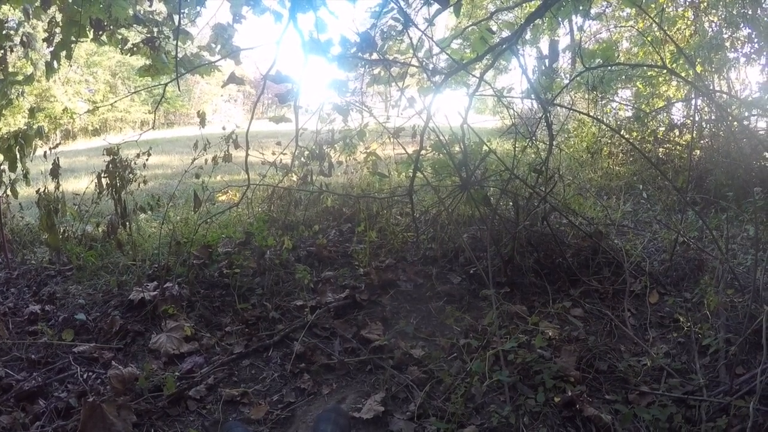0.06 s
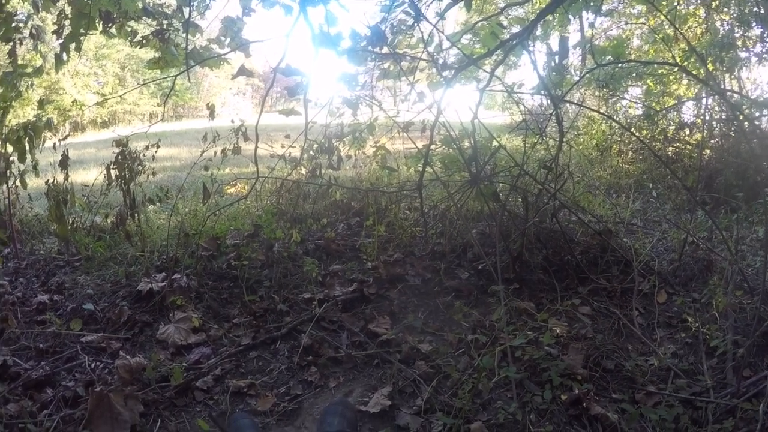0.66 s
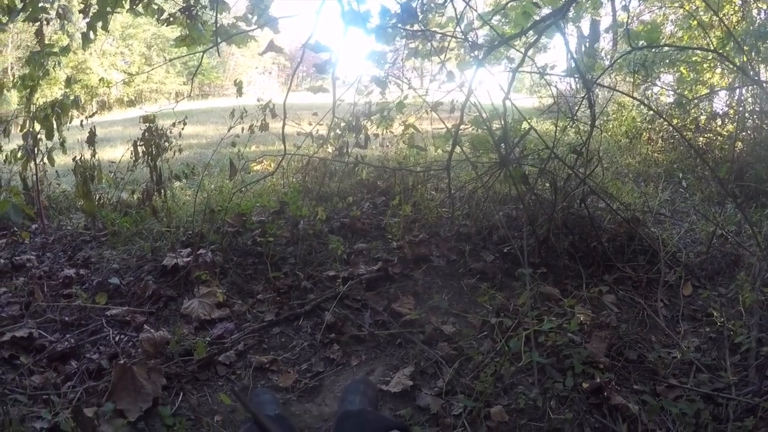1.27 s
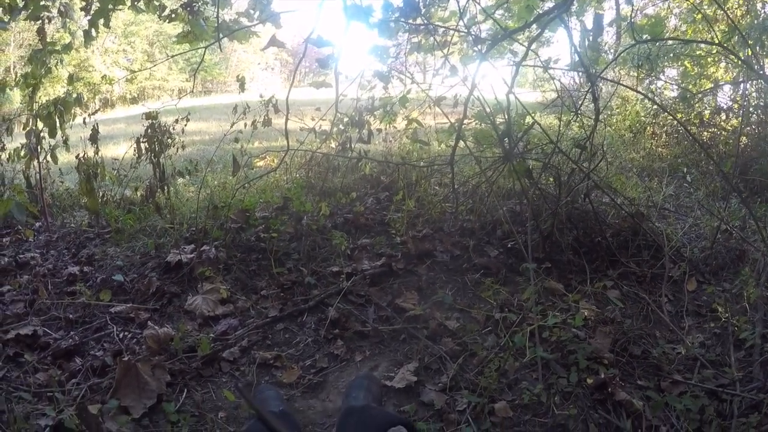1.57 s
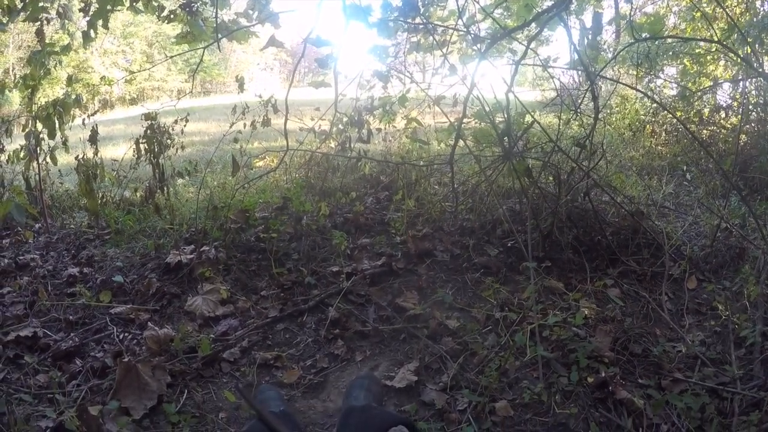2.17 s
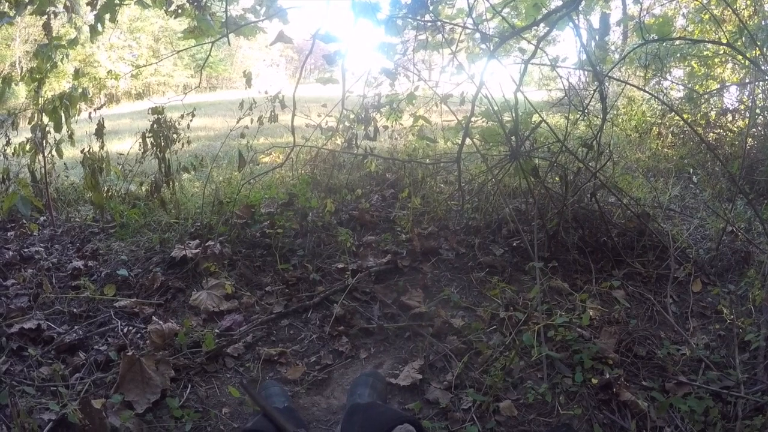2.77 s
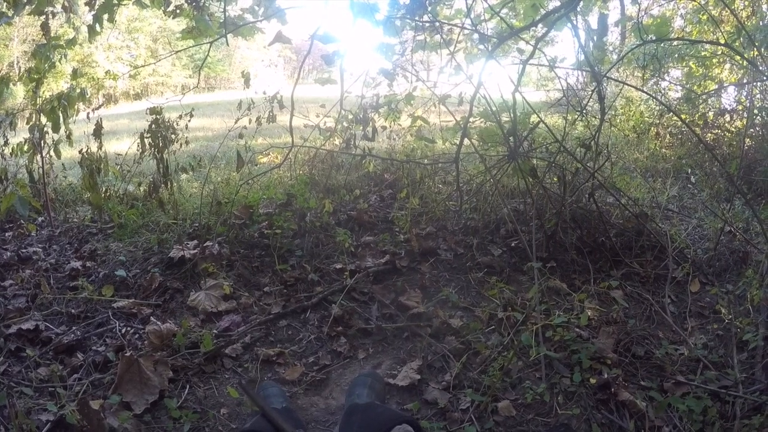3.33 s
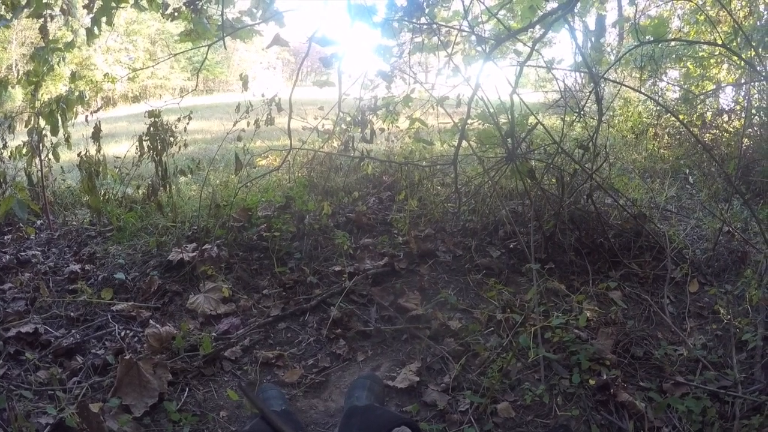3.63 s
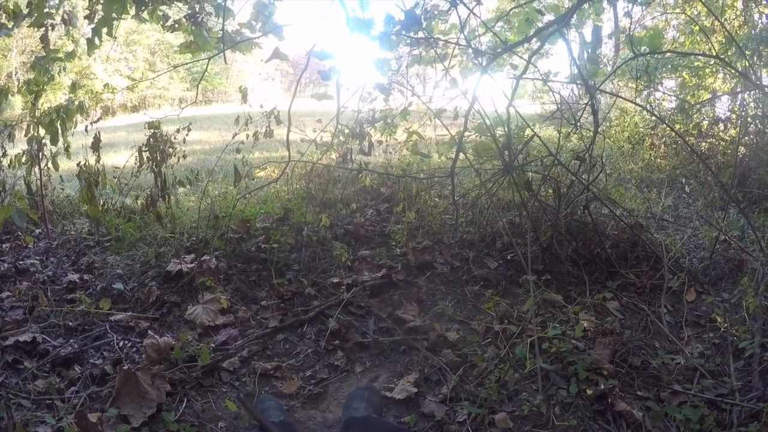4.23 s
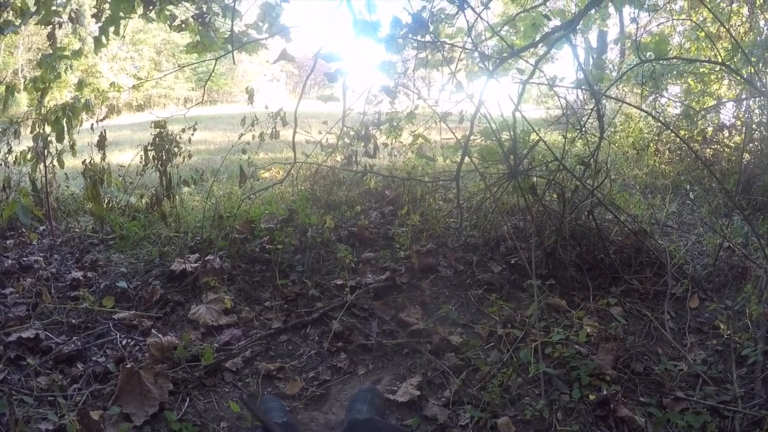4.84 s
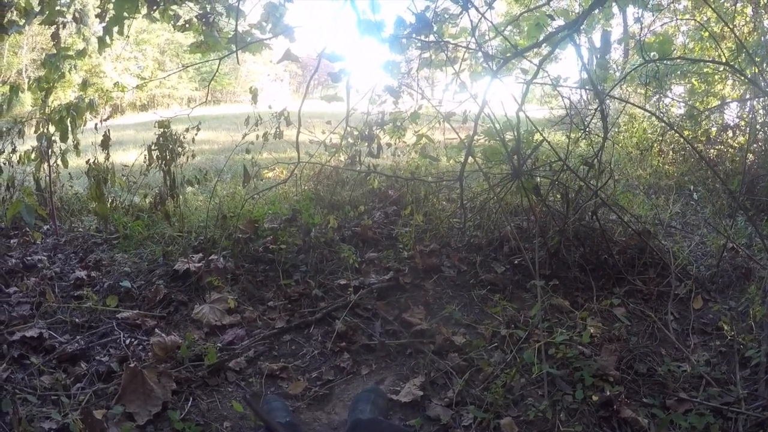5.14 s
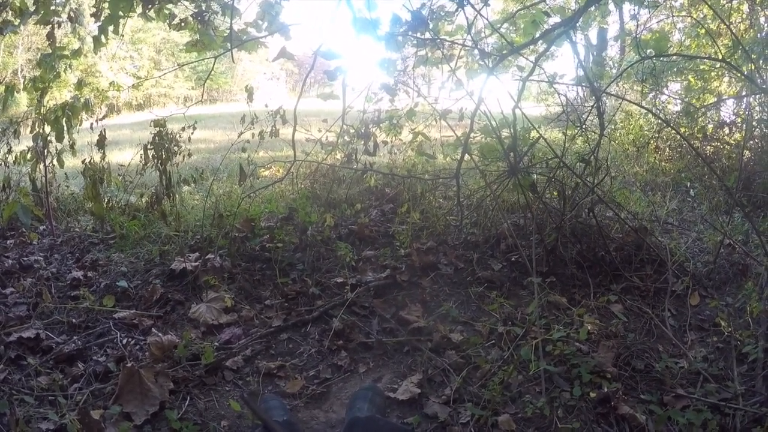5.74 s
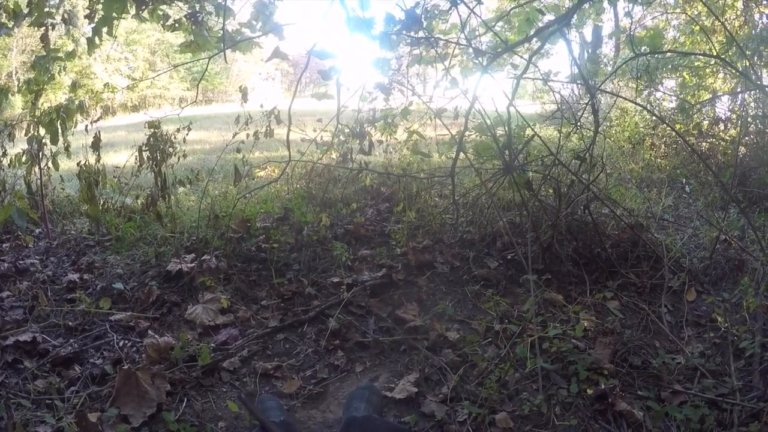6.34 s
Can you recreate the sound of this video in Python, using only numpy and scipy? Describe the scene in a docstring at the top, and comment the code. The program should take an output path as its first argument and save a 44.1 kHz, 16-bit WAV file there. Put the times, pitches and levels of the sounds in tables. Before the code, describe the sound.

One rising and falling yelp from a turkey hen near the microphone is followed by five evenly spaced, squeaky, raspy putts, the last two trailed by a clear pip. Then turkeys among the trees give about eight yelps, mixed with one cluck, and end on two sharp, dry clucks. Each call leaves a soft woodland tail. Beneath are a low far drone, faint outdoor hiss and a very thin high whine.

```python
"""Wild turkeys at the wooded edge of a field. The hen nearest the microphone opens with an arched yelp.
Five putts follow, squeaks that drop into a rasp, the last two trailed by a clear pip. From 2.6 s
comes a run of yelps with a dry cluck near its start, and two more clucks close the scene. Each call is
a pulsing membrane ringing in a throat, scattered by the trees into a long soft tail. Under it all
lie a far rumble and drone, quiet outdoor air and the thin whine of the camera."""
import sys
import numpy as np
from scipy import signal
from scipy.fft import rfft, irfft
from scipy.io import wavfile
from scipy.ndimage import uniform_filter1d, map_coordinates

SR = 44100
rng = np.random.default_rng(int(sys.argv[2]) if len(sys.argv) > 2 else 0)


def store_pcm(level_fs):
    """Save levels as 16-bit WAV."""
    pcm = np.round(np.clip(level_fs, -1, 1) * 32767).astype(np.int16)
    wavfile.write(sys.argv[1], SR, np.atleast_2d(pcm).T)


N = 282240
TIME = np.arange(N) / SR
CUTOFF_HZ = 15300   # top of the camera's range


# Hens among the trees. Each row: start, rise and fall in seconds, top pitch in Hz, level in dB,
# overtone boost in dB, extra boost from the third harmonic up in dB.
YELPS = [ (2.635, 0.058, 0.091, 781, -63.5, 5, -15), (3.038, 0.057, .108, 862.1, -44, 0.5, 8),
         (3.496, 0.057, 0.11, 857.3, -44.5, 2, 4.5), (4.013, .063, .098, 856, -45, 3, 7.5),
         (4.215, 0.0632, 0.13, 768.3, -48.5, 5, 1.5), (4.521, .060, 0.11, 860, -42, 1.5, 6),
         (4.787, .073, .104, 772, -50.5, 2, 1), (5.165, 0.0623, 0.12, 764.7, -51, 11, -7), ]
# Their throat and beak in a yelp. Each row: frequency in Hz, gain in dB.
YELP_THROAT = [(450, -15), (620, -8), (830, -3), (1000, -8), (1200, -6), (1550, 0), (1750, 0), (2000, -8),
               (2200, -26), (2550, -32), (3300, -44), (4100, -32), (4500, -37), (5100, -31), (5900, -48),
               (8000, -60)]
def yelp(rise, fall, top_hz, level_db, bright_db, upper_db, throat=YELP_THROAT,
         droop_db=12, dulling_db=7.5, upper_loss_db=7.0, **voice):
    """The membrane tightens to the top of an arch, then slackens; level and overtones sink with pitch."""
    t = seconds(rise + fall)
    falling = t > rise
    from_top = np.interp(t, [0, rise, rise + fall], [1, 0, 1])
    roundness = np.where(falling, 0.1077, 0.457)   # 0 is a straight slope
    slack = (np.hypot(from_top, roundness) - roundness) / (np.hypot(1, roundness) - roundness)
    pitch = top_hz * (1 - slack * np.where(falling, 0.41, 0.34))
    weak = np.where(falling, 1 - (1 - slack) ** 2, slack)   # the voice gives way early in the fall
    dull = weak * np.where(falling, 1, 0.45)
    return whistle(t, pitch, level_db - droop_db * weak, bright_db - dulling_db * dull,
                   upper_db - upper_loss_db * dull, throat, **voice)


# The hen closest to the microphone. One row, with the same columns as YELPS.
NEAR_YELP = [(.006, .058, .119, 791.4, -35.5, 4.3, -4.5)]
# Her throat. Each row: frequency in Hz, gain in dB.
NEAR_THROAT = [(450, -13.5), (620, -7), (780, -1.5), (1150, 1.5), (1550, 1), (1750, -1), (2000, -14),
               (2350, -25), (3100, -25), (3900, -27), (4300, -29.5), (4650, -22.5), (5300, -22),
               (6000, -36), (8000, -59)]
def near_yelp(*row):
    """The nearest hen has a deeper throat and holds her overtones longer on the way down."""
    return yelp(*row, throat=NEAR_THROAT, droop_db=13.5, dulling_db=5.5, upper_loss_db=-1.5,
                flutter_db=2.26, top_rasp=0.073, slack_rasp=0.81)


# Putts from among the trees. Each row: start, squeak length and rasp length in seconds; squeak start,
# squeak end and final pitch in Hz; squeak level, rasp level and catch in dB; roughness from 0 to 1;
# overtone boost in dB.
PUTTS = [ (.527, .021, .011, 1219, 1087, 830, -39, -40, 3, 0.9, 13.5),
         (.881, 0.03, 0.034, 1128, 1007, 676.7, -51.5, -45, 5, 0.59, -1),
         (1.243, .023, .036, 1599, 1027, 416, -46.5, -44.5, 2, 0.83, 11),
         (1.578, .020, .050, 1097, 995.5, 591, -48, -43.5, 4.5, 0.35, 3),
         (1.939, .026, 0.069, 1119, 988, 602.3, -49.5, -45.5, 1.5, 0.31, 2.5), ]
# Throat and beak in a putt. Each row: frequency in Hz, gain in dB.
PUTT_THROAT = [(400, -16.5), (600, -13), (760, 4), (1000, -0.5), (1250, -2), (1600, 2.5), (1950, -5.5),
               (2250, -6.5), (2550, -14), (3050, -32.5), (3900, -29.5), (4700, -29.5), (5400, -34.5),
               (7000, -42)]
def putt(squeak_s, rasp_s, start_hz, break_hz, final_hz, squeak_db, rasp_db, catch_db,
         roughness, bright_db):
    """A clear, falling squeak breaks into a lower rasp that settles and fades."""
    attack_s, swell_db, catch_s, fade_db = 0.00578, 18.5, 0.0024, 13
    break_ratio, settle_rate = 0.82, 3.5
    t = seconds(squeak_s + rasp_s)
    broken = t > squeak_s
    progress = np.clip((t - squeak_s) / rasp_s, 0, 1)
    squeak_hz = start_hz * (break_hz / start_hz) ** (t / squeak_s)
    rasp_hz = final_hz + (break_ratio * break_hz - final_hz) * np.exp(-settle_rate * progress)
    pitch = np.where(broken, rasp_hz, squeak_hz)
    # the voice catches just before the break, then bursts out by as much
    catch = catch_db * np.exp(-np.abs(t - squeak_s) / catch_s)
    level_db = np.where(broken, rasp_db + catch - fade_db * progress ** 2,
                        squeak_db - catch - swell_db * np.exp(-t / attack_s))
    rasp = 0.068 + roughness * np.sqrt(progress)
    pitch, level_db = uniform_filter1d([pitch, level_db], size=48)   # the break takes about 1 ms
    return syrinx(t, pitch, level_db, rasp, bright_db * (1 - progress), PUTT_THROAT,
                  jitter=0.231, shimmer=1.0, hiss=1.0, fade_s=0.0025)


# Dry clucks among the trees. Each row: start and length in seconds, starting pitch in Hz, level in dB,
# roughness from 0 to 1, boost from the third harmonic up in dB.
CLUCKS = [ (2.981, 0.041, 827.5, -37.5, 0.59, 5.5), (5.565, .025, 830, -36, 0.38, 0.5),
          (6.043, .026, 830, -36, 0.4, -1.5), ]
# The tight throat of a cluck. Each row: frequency in Hz, gain in dB.
CLUCK_THROAT = [(400, -24.5), (620, -22), (780, 4), (930, -10.5), (1250, -11), (1500, 5.5), (1680, 5),
                (1880, -7), (2250, -6.5), (2650, -19), (3100, -32.5), (4600, -35), (5300, -32.5),
                (7000, -65)]
def cluck(length, start_hz, peak_db, roughness, upper_db):
    """A burst of uneven pulses in a tight throat swells while its pitch drops, then is choked off."""
    swell_s, swell_db, choke_db_per_s, fall_octaves_per_s = 0.018, 10, 997.5, 31
    t = seconds(length)
    pitch = start_hz * 2 ** (-fall_octaves_per_s * t)
    level_db = peak_db - np.maximum(swell_db * (1 - t / swell_s), choke_db_per_s * (t - swell_s))
    return syrinx(t, pitch, level_db, roughness, 0, CLUCK_THROAT,
                  jitter=0.2, shimmer=0.35, hiss=1.5, fade_s=0.0015, upper_db=upper_db)


# Clear notes just after two putts. Each row: start and length in seconds, pitch in Hz, level in dB.
PIPS = [(1.644, 0.042, 1017, -42.5), (2.008, 0.041, 1013, -46.5)]
def pip(length, hz, level_db, attack_s=0.011, fade_db=7):
    """An almost pure note that swells and fades on one pitch."""
    t = seconds(length)
    swell_db = np.interp(t, [0, attack_s, length], [-fade_db, 0, -fade_db])
    return whistle(t, np.full(len(t), hz), level_db + swell_db, bright_db=-23)


def whistle(t, pitch, level_db, bright_db, upper_db=0, throat=YELP_THROAT,
            flutter_db=1.3, clear_hz=820, top_rasp=0.14, slack_rasp=0.71):
    """A quavering whistle, clear when high and hoarse where the membrane is slack."""
    rasp = top_rasp + slack_rasp * np.maximum(1 - pitch / clear_hz, 0)
    quaver = 0.016 * wander(t * 110)
    flutter = flutter_db * wander(t * 90)
    return syrinx(t, pitch * (1 + quaver), level_db + flutter, rasp, bright_db, throat,
                  jitter=0.13, shimmer=1.0, hiss=2.2, fade_s=0.005, upper_db=upper_db)


def syrinx(t, pitch, level_db, rasp, bright_db, throat, jitter, shimmer, hiss, fade_s, upper_db=0):
    """Membrane cycles of uneven length and strength, each with a puff of air, ring in the throat."""
    cycles = np.cumsum(pitch) / SR
    uneven_pitch = pitch * (1 + jitter * rasp * wander(cycles))
    phase = 2 * np.pi * np.cumsum(uneven_pitch) / SR
    harmonic = np.arange(1, 15)[:, None]
    in_range = harmonic * pitch < CUTOFF_HZ
    gains = in_range * from_db(bright_db * (harmonic > 1) + upper_db * (harmonic > 2))
    strength = np.exp(shimmer * rasp * wander(cycles))
    pulses = strength * (gains * np.cos(harmonic * phase)).sum(0)
    puffs = (1 + np.cos(phase)) * rng.standard_normal(len(t))
    voice = through_throat(pulses + hiss * rasp * from_db(bright_db / 2) * puffs, throat)
    voice /= np.sqrt(uniform_filter1d(voice ** 2, size=160) + 1e-12)   # effort alone sets the level
    edges = np.clip(np.minimum(t, t[-1] - t) / fade_s, 0, 1)
    return voice * edges * from_db(level_db)


def through_throat(x, throat, size=2048):
    """The throat as a causal filter: each pulse sets it ringing."""
    hz = np.abs(np.fft.fftfreq(size, 1 / SR))
    log_gain = np.log(gain_at(throat, hz))
    minimum_phase = np.exp(np.conj(signal.hilbert(log_gain)))
    ring = np.fft.ifft(minimum_phase).real
    return signal.fftconvolve(x, ring)[:len(x)]


def calls(table, voice, near_echo_db=-10):
    """The birds move, so each call of a table reaches the microphone with its own close reflection."""
    out = np.zeros(N + SR)
    for start, *row in table:
        call = voice(*row)
        at = int(start * SR) + np.arange(len(call))
        lag = int(rng.uniform(0.003, 0.008) * SR)
        out[at] += call
        out[at + lag] += from_db(near_echo_db) * call   # gliding harmonics run through its notches
    return out[:N]


def flock(near_wet_db=-6, pip_wet_db=-5, spill_db=-2, cluck_spill_db=3):
    """All the birds as heard from the field's edge; the nearest stirs the woods least."""
    putts, clucks = calls(PUTTS, putt), calls(CLUCKS, cluck)
    among_trees = calls(YELPS, yelp) + putts + clucks
    near = calls(NEAR_YELP, near_yelp, near_echo_db=-15)
    pips = calls(PIPS, pip)
    echoes = woods(among_trees + from_db(near_wet_db) * near + from_db(pip_wet_db) * pips)
    # the low part of a short call spreads all round and comes back from deeper in the trees
    low = low_pass(putts + from_db(cluck_spill_db) * clucks, hz=1000, order=4)
    spill = from_db(spill_db) * scatter(low, t60=0.79, build_up_s=0.16)
    return among_trees + near + pips + echoes + spill


# Distinct echoes off near trunks and the tree line. Each row: delay in seconds, gain in dB.
ECHOES = [(.0105, -20.5), (.022, -12), (.034, -15), (.072, -25), (.104, -20)]
def woods(x, brush_db=-12, forest_db=-8):
    """Dull echoes off trunks, a short blur from near brush, a long tail that loses treble in leaves."""
    dull = low_pass(x, hz=3000, order=1)
    trunks = sum(from_db(db) * np.interp(TIME - delay, TIME, dull, left=0) for delay, db in ECHOES)
    brush = from_db(brush_db) * scatter(x, t60=0.12, build_up_s=0.0099)
    far = low_pass(x, hz=3300, order=2)
    forest = from_db(forest_db) * scatter(far, t60=1.0, build_up_s=0.081)
    return trunks + brush + forest


# Colour of the tail coming back from the trees. Each row: frequency in Hz, gain in dB.
TAIL_COLOUR = [(300, 9.5), (750, 3), (1050, 7.5), (1600, 2), (2300, -4), (4500, 15), (9000, -12.5)]
def scatter(x, t60, build_up_s):
    """Countless small echoes that gather and die away."""
    t = TIME[:2 * SR]
    envelope = (1 - np.exp(-t / build_up_s)) * from_db(-60 * t / t60)
    response = coloured_noise(len(t), TAIL_COLOUR) * envelope / np.sqrt(np.sum(envelope ** 2))
    return signal.fftconvolve(x, response)[:N]


# Rumble from far off. Each row: frequency in Hz, relative noise density in dB.
RUMBLE_COLOUR = [(15, -28), (25, -6), (37, 10.5), (52, -6.5), (74, 5), (88, -2), (120, -4), (170, -15.5),
                 (240, -19.5), (390, -48), (700, -48), (2000, -53)]
def far_rumble():
    """A deep, distant noise that swells slightly."""
    return background(RUMBLE_COLOUR, level_db=-52.5, swell_db=0.97)


# A drone in the distance. Each row: frequency in Hz, relative noise density in dB.
DRONE_COLOUR = [(70, -22), (120, -2), (180, -3), (240, -6.5), (305, 0.5), (390, -7), (550, -7), (900, -42)]
# Its slow course. Each row: time in seconds, level in dB before lulls and swells.
DRONE_LEVEL = [(0, -62.5), (1.6, -60.5), (3, -63.5), (4.5, -60), (5.5, -63), (6.4, -67)]
# Its lulls. Each row: centre and half-width in seconds, depth in dB.
DRONE_LULLS = [(1.1, .13, 13.5), (2.3, 0.21, 18.5), (3.89, 0.059, 22), (5.08, 0.16, 25)]
def far_drone():
    """A low, distant noise that swells slowly and sinks away in lulls."""
    level_db = np.interp(TIME, *np.transpose(DRONE_LEVEL))
    lulls_db = sum(depth * np.exp(-((TIME - s) / width) ** 2) for s, width, depth in DRONE_LULLS)
    return background(DRONE_COLOUR, level_db - lulls_db, swell_db=2.3)


# Open air around the microphone. Each row: frequency in Hz, relative noise density in dB.
AIR_COLOUR = [(200, 0), (500, -3.5), (730, 7), (900, 0), (1100, -5), (1500, -5.5), (1900, -9), (3200, -12),
              (4900, -10.5), (6300, -15.5), (9500, -20.5), (10100, -13.5), (11000, -20), (15200, -23.5)]
def field_air():
    """The faint, steady hiss of the outdoors."""
    return background(AIR_COLOUR, level_db=-60.5, swell_db=0)


def background(spectrum, level_db, swell_db):
    """Coloured noise whose rms level drifts at random about level_db."""
    noise = coloured_noise(N, spectrum)
    noise /= np.sqrt(np.mean(noise ** 2))
    return noise * from_db(level_db + swell_db * wander(TIME * 2))


def coloured_noise(n, spectrum):
    """White noise shaped by a spectrum."""
    gain = gain_at(spectrum, np.fft.rfftfreq(n, 1 / SR))
    return irfft(rfft(rng.standard_normal(n)) * gain, n)


def gain_at(spectrum, hz):
    """Read a dB spectrum on a log-frequency axis, as a gain."""
    points_hz, db = np.transpose(spectrum)
    return from_db(np.interp(np.log(np.maximum(hz, 1)), np.log(points_hz), db))


def low_pass(x, hz, order):
    """Roll off the treble above hz."""
    return signal.sosfilt(signal.butter(order, hz, fs=SR, output="sos"), x)


def wander(position):
    """A fresh random value at every whole step of position, joined smoothly."""
    return map_coordinates(rng.standard_normal(1024), [position], order=3, mode="wrap")


def from_db(db):
    """Decibels to gain."""
    return 10 ** (np.asarray(db) / 20)


def seconds(length):
    """The time axis of one call."""
    return np.arange(int(length * SR)) / SR


def scene():
    """The flock over the quiet of the field, at one microphone."""
    quiet = far_rumble() + far_drone() + field_air()
    return (flock() + quiet)[None]


# The camera's own whine. Each row: frequency in Hz, rms level in dB.
CAMERA_WHINE = [(10405.6, -71), (12851.1, -94)]
def record(dry):
    """The camera adds its whine and cuts the top."""
    whine = sum(np.sqrt(2) * from_db(db) * np.sin(2 * np.pi * hz * TIME) for hz, db in CAMERA_WHINE)
    top_cut = signal.firwin(801, CUTOFF_HZ, fs=SR)
    return signal.fftconvolve(dry + whine, top_cut[None], mode="same")


dry = scene()
out = record(dry)
store_pcm(out)
```